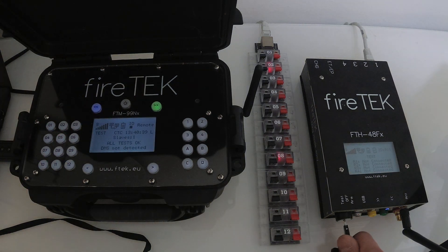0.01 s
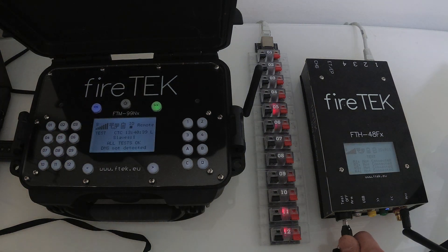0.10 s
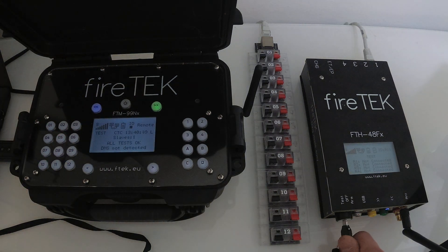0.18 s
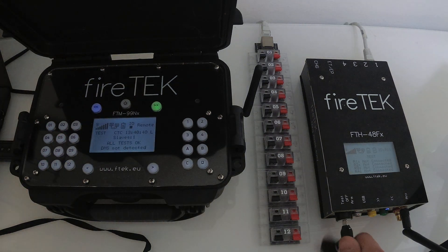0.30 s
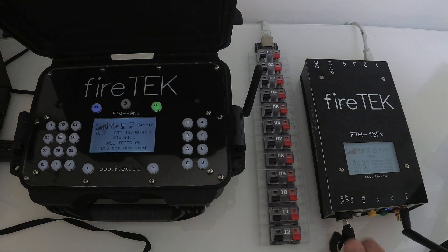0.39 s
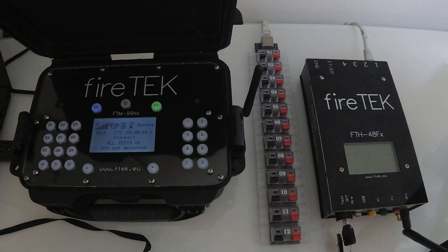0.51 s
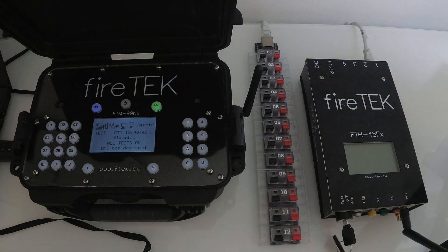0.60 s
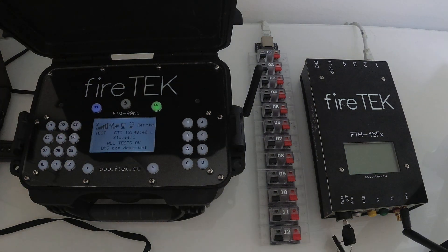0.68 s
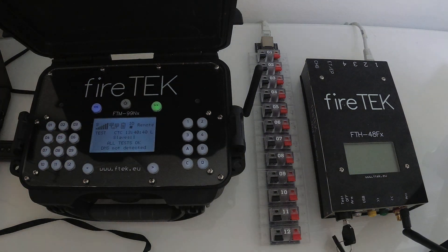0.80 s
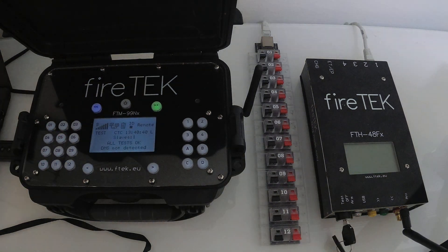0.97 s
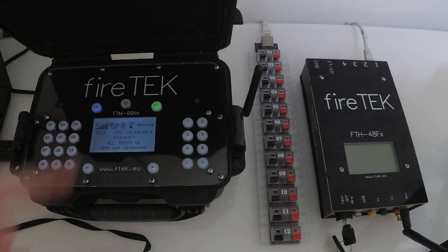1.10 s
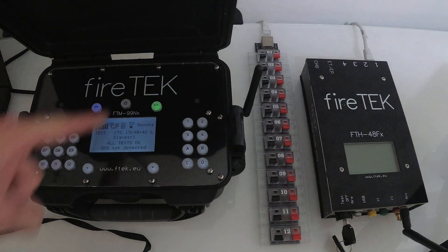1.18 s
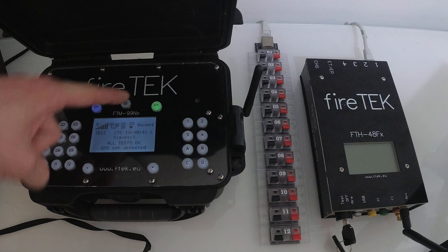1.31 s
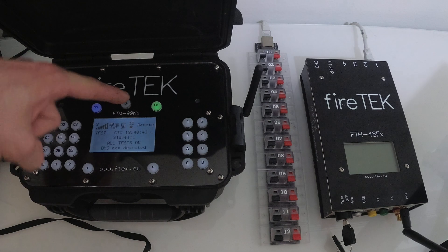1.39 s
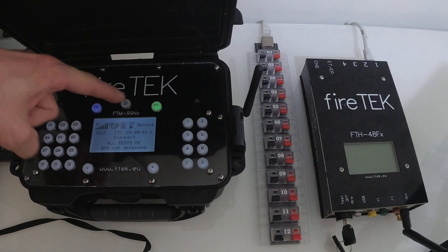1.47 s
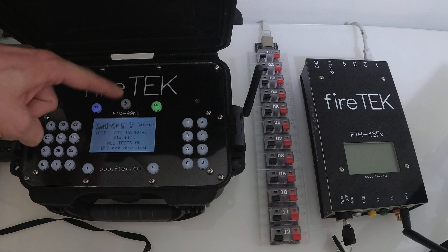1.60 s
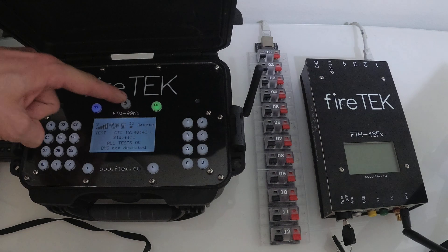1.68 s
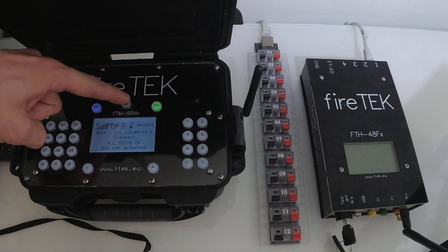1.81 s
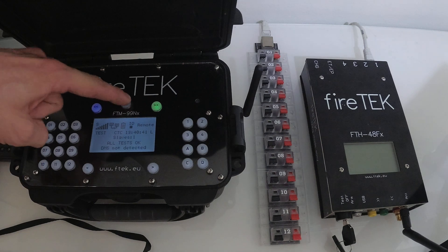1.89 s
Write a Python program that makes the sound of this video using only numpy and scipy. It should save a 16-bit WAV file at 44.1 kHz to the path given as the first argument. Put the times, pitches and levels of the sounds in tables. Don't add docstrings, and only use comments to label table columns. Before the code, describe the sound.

A key switch on a small box is turned back: a short hollow knock, a tiny tick, then a loud crisp snap and a weaker second click, with faint sleeve rustle and fan hum in a furnished room.

```python
import sys
import numpy as np
from scipy import signal
from scipy.io import wavfile

SR = 44100
rng = np.random.default_rng(int(sys.argv[2]) if len(sys.argv) > 2 else 0)


def pcm_store(signal):
    levels = np.round(np.clip(np.atleast_2d(signal), -1, 1) * 32767)
    wavfile.write(sys.argv[1], SR, levels.astype(np.int16).T)


def elevation(decibels):
    levels = np.asarray(decibels, float)
    return 10 ** (levels / 20)


N = 83790


def at_hz(points, hz):
    points_hz, values = np.array(points).T
    return np.interp(np.log(hz), np.log(points_hz), values)


def rms_one(x):
    return x / np.sqrt(np.mean(x ** 2) + 1e-20)


def butter(x, order, hz, kind="low"):
    return signal.sosfilt(signal.butter(order, hz, kind, fs=SR, output="sos"), x)


def drift(rate_hz):
    r = np.exp(-80 * np.pi * rate_hz / SR)
    noise = rng.standard_normal(N // 40 + 2002)
    slow = signal.lfilter([1], [1, -2 * r, r * r], noise)[2000:]
    return np.interp(np.arange(N) / 40, np.arange(len(slow)), rms_one(slow))


def bands():
    edges = 22 * 2 ** np.arange(0, 10, .5)
    return [(np.sqrt(low * high), signal.butter(2, [low, high], "band", fs=SR, output="sos"))
            for low, high in zip(edges, edges[1:])]


def chatter(ms):
    hits_per_ms = 6.0
    t = np.arange(400) / SR * 1000 / ms
    hits = (rng.random(400) < hits_per_ms * 1000 / SR) * rng.normal(size=400)
    first_touch = .4 * (t == 0)
    return hits * np.sqrt(t) * np.exp(-1.5 * t) + first_touch


def strike(force, modes, even=True):
    force, out = np.pad(force, (0, SR // 8)), 0
    for k, (hz, db, t60) in enumerate(modes):
        r = elevation(-60 / (t60 * SR))
        w = 2 * np.pi * hz / SR
        ring = signal.lfilter([1, 0, -1], [1, -2 * r * np.cos(w), r * r], force)
        height = np.abs(ring).max() if even else 1
        out = out + (-1) ** k * elevation(db) * ring / height
    return out / np.abs(out).max()


def add(into, x, s, db, pan_db):
    i = max(int(s * SR), 0)
    x = x[:N - i]
    sides_db = np.array([[.5], [-.5]]) * pan_db
    into[:, i:i + len(x)] += elevation(db + sides_db) * x


# (frequency [Hz], density [dB per Hz])
MURMUR_COLOUR = [(20, -50.5), (50, -12.5), (140, -6), (230, -2), (600, -11.5), (1200, -14.5), (2500, -18.5),
                 (15600, -20.5)]
# (frequency [Hz], likeness [-1 to 1])
SIDE_LIKENESS = [(60, 1), (240, 0.39), (950, 0.28), (3770, -0.089), (15000, -0.031)]
# (frequency [Hz], left minus right [dB])
SIDE_TILT = [(60, -3), (380, 2.5), (2380, -0.5), (15000, 0)]


def murmur_and_hiss():
    level_db = -59.5
    out, white = 0, rng.standard_normal((2, 2, N + 4000))
    for k, (hz, sos) in enumerate(bands()):
        mid, side = signal.sosfilt(sos, white[k % 2])[:, 4000:]
        alike = np.clip(at_hz(SIDE_LIKENESS, hz), -1, 1)
        lumps_db = at_hz([(300, 0.26), (3000, 0.09)], hz) * drift(45)
        tilt_db = at_hz(SIDE_TILT, hz) * np.array([[.5], [-.5]])
        gain = elevation(at_hz(MURMUR_COLOUR, hz) + lumps_db + tilt_db)
        out = out + gain * (np.sqrt(1 + alike) * mid + np.sqrt(1 - alike) * side * [[1], [-1]])
    return elevation(level_db) * rms_one(out)


# (frequency [Hz], level [dB rms])
HUM_LINES = [(97, -81.5), (146, -68.5), (344.5, -68), (640.6, -72), (1120, -81.5), (15703, -75)]


def hum():
    waver_hz, waver_db = 4.08, 2.5
    out = 0
    for hz, db in HUM_LINES:
        loose = hz < 5000
        phase = 2 * np.pi * np.cumsum(hz + loose * waver_hz * drift(7.54)) / SR
        level = elevation(db + loose * waver_db * drift(10.5))
        out = out + np.sqrt(2) * level * np.sin(phase + [[0], [.3]])
    return out


# (frequency [Hz], t60 [s])
ROOM_DECAY = [(150, 0.25), (1000, 0.57), (5000, 0.44), (15000, 0.29)]


def room(x, colour):
    first_wall_s, build_s, alike_below_hz = 0.0039, 0.003, 960
    t = np.arange(SR // 2) / SR
    white = rng.standard_normal((2, 2, len(t)))
    echo = 0
    for k, (hz, sos) in enumerate(bands()):
        fade_db = at_hz(colour, hz) - 60 * t / at_hz(ROOM_DECAY, hz)
        echo = echo + signal.sosfilt(sos, white[k % 2]) * elevation(fade_db)
    bass_difference = signal.lfilter(*signal.butter(1, alike_below_hz, fs=SR), (echo[0] - echo[1]) / 2)
    echo = echo - bass_difference * [[1], [-1]]
    echo = echo * np.clip((t - first_wall_s) / build_s, 0, 1)
    echo = echo / np.sqrt(np.sum(echo ** 2) / 2)
    return signal.fftconvolve(x, echo, axes=1)[:, :N]


def clicks(events, glow):
    out = np.zeros((2, N))
    pulse = elevation(-10) * strike(np.ones(1), glow)
    pulse[0] += 1
    for s, db, *_ in events:
        add(out, pulse, s, db, 0)
    return out


# (time [s], peak level [dB], dullness [Hz], pan [dB])
HAND_BUMPS = [(.5215, -49, 4000, 1.5), (.5235, -50, 3200, 1.5), (.5275, -50, 2000, 1.5),
              (.535, -51, 500, 1.5), (.722, -49, 1900, 3), (.729, -50, 1700, 3), (.9625, -54, 700, 9),
              (.9655, -51, 600, 7), (.9685, -50, 450, 7), (1.093, -56, 1100, 4), (1.2095, -50, 750, 7),
              (1.31, -51, 8000, .1), (1.4505, -53, 1000, 2.5), (1.4535, -51, 900, 2.5),
              (1.69, -57, 350, 1.5)]
# (frequency [Hz], level [dB], t60 [s])
TABLE_MODES = [(213, -2, 0.025), (354, 3.5, 0.031), (456, 1.5, 0.024), (671, 8.5, 0.017), (1060, 7, 0.012),
               (1375, 7, 0.012), (1820, 0, 0.024), (2610, 3.5, 0.014), (5470, -2, 0.0014)]
# (start [s], length [s], level [dB], centre [Hz], pan [dB])
SLEEVE_STROKES = [
    (.26, .12, -61, 330, 1.5),
    (.34, .15, -63, 800, 4.5),
    (.63, .14, -64, 1200, 3.5),
    (.72, .04, -60, 217, -5),
    (.68, .08, -72, 4500, .1),
    (.63, .13, -65, 560, 1.5),
    (1.06, .14, -66, 950, 10),
    (1.12, .12, -67, 600, 10),
    (1.16, .14, -65, 850, 10),
]


def hand():
    out = np.zeros((2, N))
    for s, db, dull_hz, pan_db in HAND_BUMPS:
        soft = butter(chatter(0.97), 2, dull_hz)
        add(out, strike(soft, TABLE_MODES, even=False), s, db, pan_db)
    for s, length, db, hz, pan_db in SLEEVE_STROKES:
        grains = rng.normal(size=SR // 4) * (rng.random(SR // 4) < .2)
        cloth = butter(grains, 2, [hz / 1.5, hz * 1.34], "band")
        swell = np.sin(np.pi * np.clip(np.arange(SR // 4) / SR / length, 0, 1))
        add(out, rms_one(cloth) * swell, s, db, pan_db)
    return out


# (time [s], peak level [dB])
CASE_KNOCKS = [
    (.0003, -27.5),
    (.0021, -33),
    (.004, -31.5),
    (0.0095, -34),
]
# (frequency [Hz], level [dB], t60 [s])
CASE_MODES = [(301, -3, 0.2), (420, -13, 0.14), (578, -2, 0.039), (853, -1.5, 0.047), (1200, 3, 0.015),
              (1450, 9.5, 0.0055), (2320, 1.5, 0.023), (3440, 12, 0.0025), (4870, 2.5, 0.0091),
              (5600, 9, 0.0054), (6790, 4, 0.0049), (8700, 10.5, 0.0015), (11200, -15, 0.0011),
              (15100, -31, .006)]


def knock():
    out = np.zeros((2, N))
    for s, db in CASE_KNOCKS:
        add(out, strike(chatter(0.98), CASE_MODES), s, db, .1)
    return out


# (frequency [Hz], level [dB], t60 [s])
CASE_BODY = [(425, -17, 0.0056), (1310, -14, 0.002), (2150, -7.5, 0.012), (4160, 16.5, 0.0066),
             (5530, 12, 0.0026), (9280, 23, 0.009)]
# (frequency [Hz], density [dB per Hz])
CASE_COLOUR = [(150, -40), (230, -18.5), (305, -3.5), (456, -6.5), (700, -14), (1250, -7), (9230, -23.5),
               (16000, -16.5)]


def knock_echo():
    return room(elevation(12.5) * clicks(CASE_KNOCKS, CASE_BODY), CASE_COLOUR)


# (time [s], peak level [dB], pan [dB])
FIRST_SLIP = [
    (.1983, -29, -6.5),
]
# (frequency [Hz], level [dB], t60 [s])
SPRING_MODES = [(1220, -13, .006), (2000, -16, .004), (3800, -17, .003), (5150, -8, .005),
                (6800, -14, .003), (7750, -12, .003), (9040, -9, .005), (10200, -1, .009),
                (11400, -11, .004), (14200, -12, .003), (15400, -8, .004)]
# (time [s], peak level [dB], frequency [Hz], t60 [s], pan [dB])
BOX_THUMPS = [
    (.2265, -36.5, 598, 0.059, 2.5),
    (.234, -43, 198, 0.11, 1),
    (.303, -43, 808, 0.07, 4.5),
    (.303, -46, 610, 0.042, 6),
]


def slip():
    out = np.zeros((2, N))
    s, db, pan_db = FIRST_SLIP[0]
    add(out, strike(chatter(1.3), SPRING_MODES), s, db, pan_db)
    for s, db, hz, t60, pan_db in BOX_THUMPS:
        one_cycle_push = np.hanning(int(SR / hz))
        add(out, strike(one_cycle_push, [(hz, 0, t60)]), s, db, pan_db)
    return out


# (time [s], peak level [dB], chatter length [ms], favoured pitch [Hz], pan [dB])
DETENT_CONTACTS = [(.2254, -34, .5, 9000, -4), (.2262, -6, .1, 5000, -4.5), (.22665, -7, .1, 5200, -4.5),
                   (.2272, -9, .2, 3000, -4), (.2278, -8, .2, 8600, -4), (.2289, -14, .2, 15000, -4),
                   (.2296, -14, .3, 8600, -4), (.2310, -18, .3, 8000, -4), (.2348, -25, .6, 8200, -3),
                   (.2365, -20, .5, 5000, -3), (.2380, -22, .4, 5000, -3), (.2398, -24, .4, 8800, -3),
                   (.3026, -25, .4, 9500, -4), (.3036, -23, .2, 5300, -4), (.3043, -22, .2, 15000, -4),
                   (.3047, -22, .1, 5300, -4), (.3053, -23, .2, 9000, -4), (.3079, -29, .2, 5000, -4),
                   (.3120, -33, .8, 5000, -3), (.3874, -41, 1.2, 13000, -3)]
SWITCH_PITCHES = [1300, 1740, 2800, 4020, 4930, 5400, 6850, 8200, 8900, 10200, 11600, 12900, 14500, 15150]
# (level [dB], t60 [s])
SWITCH_MODES = [(-5.5, 0.0079), (-14, 0.01), (-2, 0.012), (-12.5, 0.011), (-5, 0.0077), (-3.5, 0.0022),
                (-1, 0.0052), (0.5, 0.004), (-4.5, 0.0056), (-7.5, 0.0044), (-11, 0.012), (-4.5, 0.0024),
                (-5, 0.0033), (-5.5, 0.0065)]


def switch():
    favour_peak_db, favour_octaves, crack_db = 13.5, 0.33, -17
    shadow_hz, shadow_db, left_lag = 1210, -11.5, 9
    out = np.zeros((2, N))
    level_db, t60 = np.transpose(SWITCH_MODES)
    for s, db, ms, pitch_hz, pan_db in DETENT_CONTACTS:
        force = chatter(ms)
        octaves_off = np.log2(np.divide(SWITCH_PITCHES, pitch_hz))
        favour_db = favour_peak_db * np.exp(-(octaves_off / favour_octaves) ** 2)
        add(out, strike(force, np.c_[SWITCH_PITCHES, level_db + favour_db, t60]), s, db, pan_db)
        crack = np.diff(force, prepend=0) / np.abs(force).max()
        add(out, crack, s, db + crack_db, pan_db)
    bass = signal.lfilter(*signal.butter(1, shadow_hz, fs=SR), out[0])
    out[0] = np.roll(out[0], left_lag) + elevation(shadow_db) * bass
    return out


# (frequency [Hz], level [dB], t60 [s])
SWITCH_BODY = [(2720, -10.5, 0.0036), (5120, 0, 0.0039), (9350, -5, 0.0036), (9970, -18, 0.034),
               (14100, -13, 0.0038)]
# (frequency [Hz], density [dB per Hz])
SWITCH_COLOUR = [(120, -28), (260, 0.5), (700, 0), (2700, -9), (5000, -2.5), (7000, -13), (9000, -1),
                 (16000, -16)]


def switch_echo():
    return room(elevation(-3.5) * clicks(DETENT_CONTACTS, SWITCH_BODY), SWITCH_COLOUR)


def scene():
    snap, tick, soft, hollow = switch(), slip(), hand(), knock()
    send = elevation(-18) * (snap + hollow) + elevation(-20) * tick + elevation(-5.5) * soft
    wet = room(send, [(20, 0), (20000, 0)]) + switch_echo() + knock_echo()
    near = butter(snap + tick + soft + hollow, 3, 150, "high")
    near = butter(near, 12, 16000)
    steep_top = signal.ellip(8, .5, 50, 15800, fs=SR, output="sos")
    far = signal.sosfilt(steep_top, murmur_and_hiss() + wet)
    return near + hum() + butter(far, 2, 40, "high")


def roll_off(x):
    return signal.sosfilt(signal.butter(12, 17040, fs=SR, output="sos"), x)


def record(dry):
    mix = butter(dry, 1, [30, 20000], "band")
    return roll_off(mix)


dry = scene()
out = record(dry)
pcm_store(out)
```